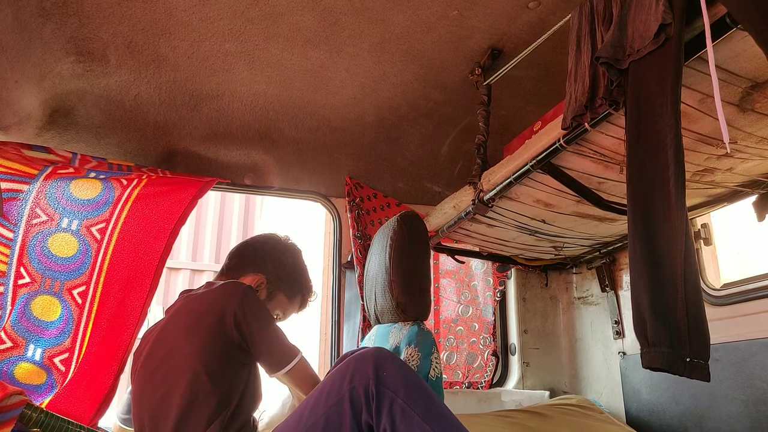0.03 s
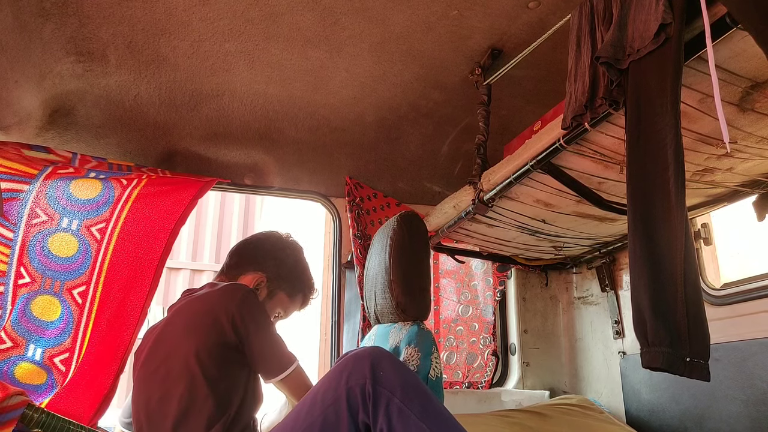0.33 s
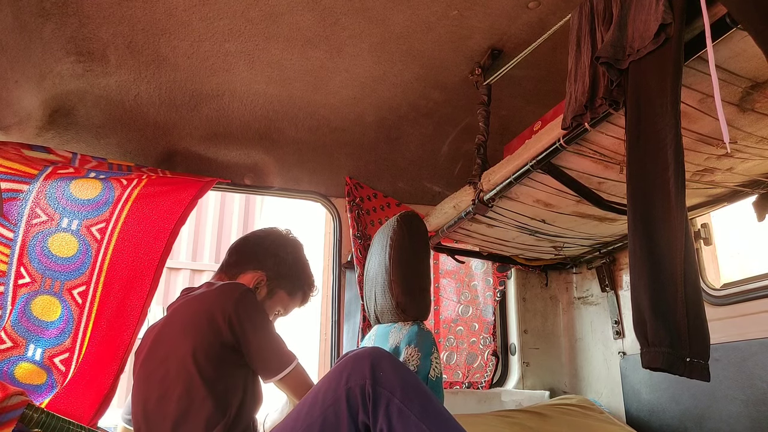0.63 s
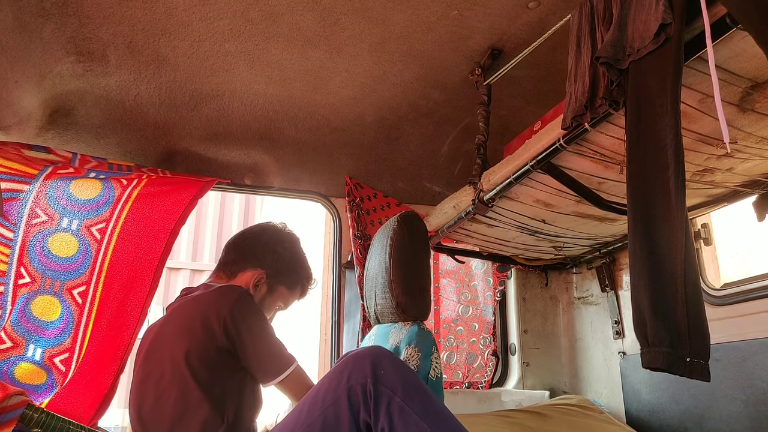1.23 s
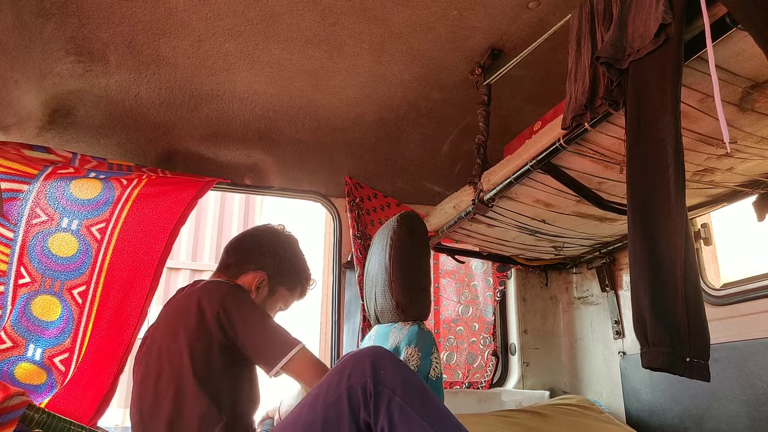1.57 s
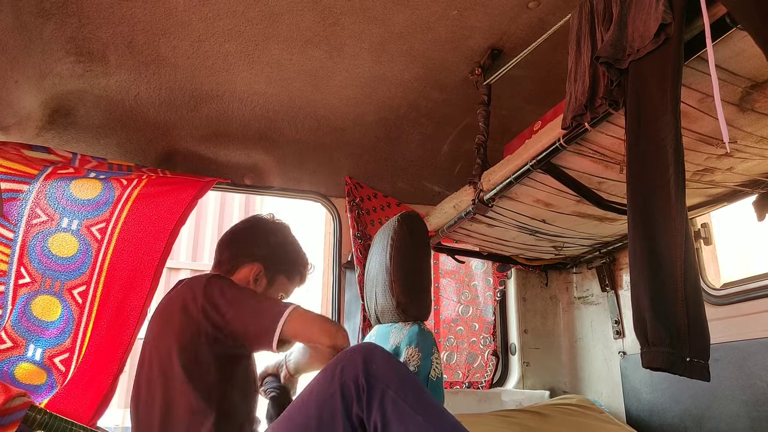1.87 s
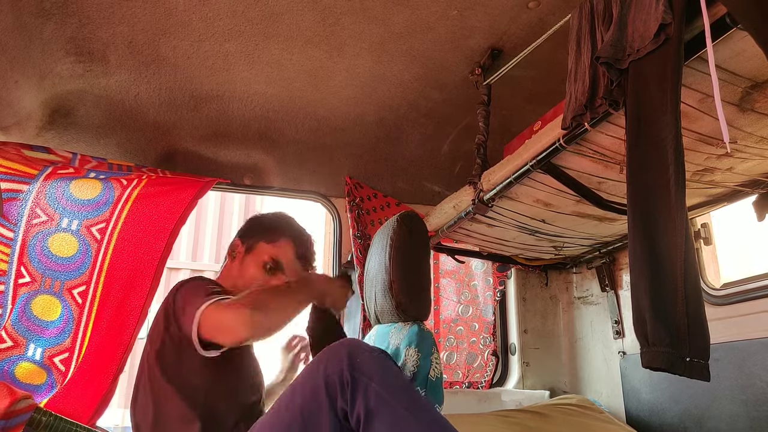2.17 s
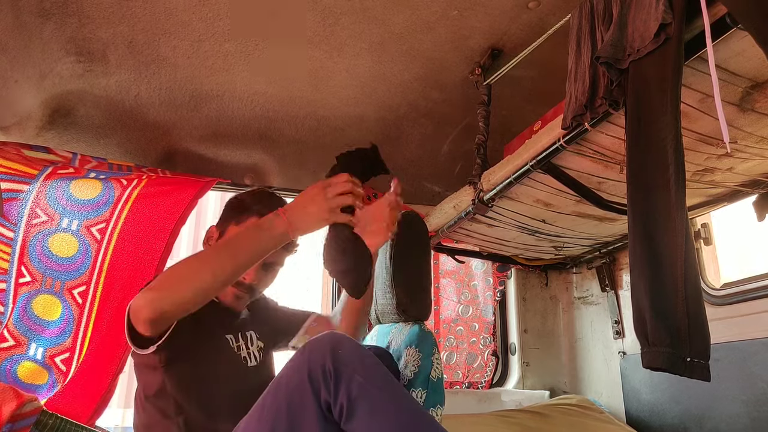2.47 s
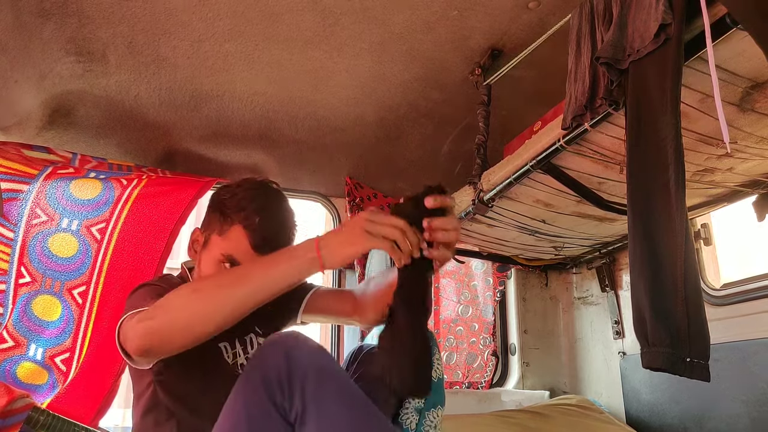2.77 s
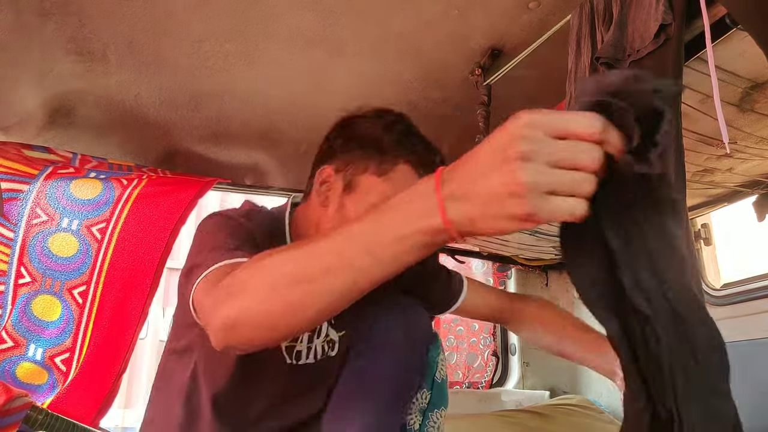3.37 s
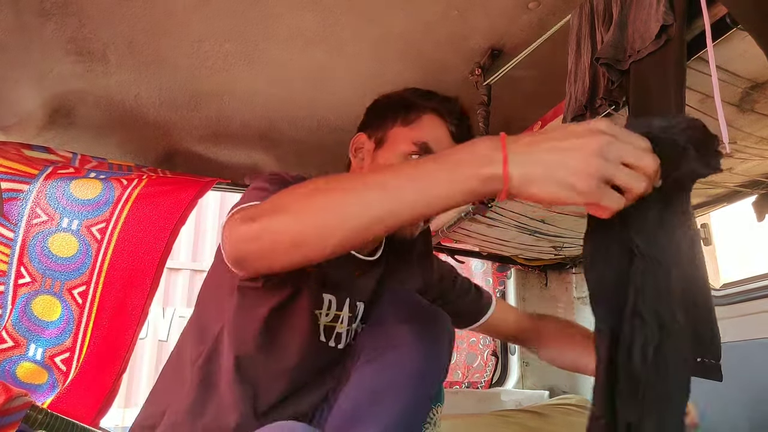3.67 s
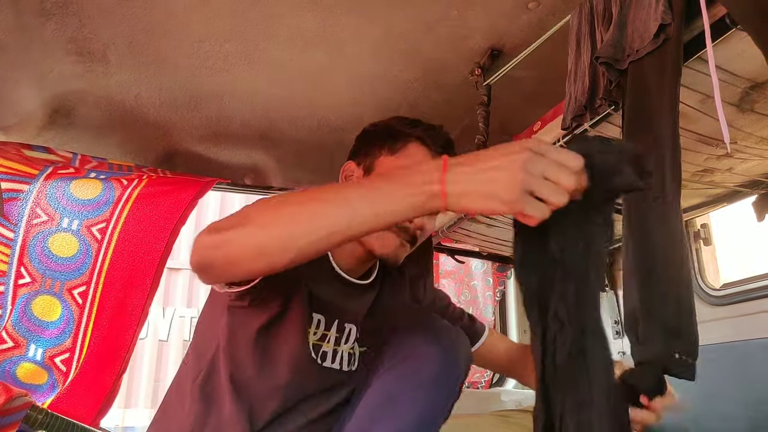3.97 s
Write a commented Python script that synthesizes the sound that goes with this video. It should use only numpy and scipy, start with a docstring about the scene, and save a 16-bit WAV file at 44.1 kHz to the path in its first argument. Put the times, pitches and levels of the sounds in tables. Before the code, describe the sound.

A garment rubs softly and flaps open close by inside a rumbling truck cabin.

```python
"""A truck cabin rumbles low throughout while a garment is handled close to a phone.
First the cloth is picked up: its fibres rub and its creases snap. From about 1.6 s it is drawn out, and
folds begin to flap. From 2.7 s it is shaken open: it billows, the tight weave zips, and at 3.2 s the
swing pushes air at the microphone. A last soft rub fades away. The left microphone opening faces the
cloth and rings near 6 kHz; the right one is shaded from it, so it is quieter and hisses."""
import sys
import numpy as np
from scipy import signal
from scipy.fft import rfft, irfft
from scipy.io import wavfile
from scipy.ndimage import uniform_filter1d

SR = 44100
rng = np.random.default_rng(int(sys.argv[2]) if len(sys.argv) > 2 else 0)


def to_wav(s):
    """Save 16-bit WAV."""
    ch = np.atleast_2d(s).T  # columns
    pcm = np.round(np.clip(ch, -1, 1) * 32767)  # PCM
    wavfile.write(sys.argv[1], SR, pcm.astype(np.int16))


N = 176400  # 4 seconds

# level at the shaded right opening compared with the left
SHADE_BASS_DB, SHADE_FLAP_DB, SHADE_WEAVE_DB, SHADE_HISS_DB, SHADE_ZIP_DB = -10.3, -13, -12.5, -21, -11


def undb(db):
    """Turn decibels into a number to multiply by."""
    return 10 ** (np.asarray(db) / 20)


def unit(x):
    """Scale a signal to a typical size (rms) of 1."""
    return x / np.std(x)


def noise():
    """White noise: all pitches equally strong."""
    return rng.standard_normal(N)


def colour(x, points):
    """Shape the tone by (pitch_hz, level_db) points; the result has size 1."""
    hz, db = np.array(points, float).T
    freqs = np.maximum(np.fft.rfftfreq(N, 1 / SR), 1)
    gain = undb(np.interp(np.log(freqs), np.log(hz), db))
    return unit(irfft(rfft(x) * gain, N))


def drift(rate_hz):
    """A smooth random wander of size 1."""
    width = max(int(SR / rate_hz), 1)
    return unit(uniform_filter1d(uniform_filter1d(noise(), width), width))


def swell(t, start, rise, hold, release):
    """Loudness that rises gently, holds and falls."""
    ramp = np.clip(np.minimum((t - start) / rise, 1 - (t - start - rise - hold) / release), 0, 1)
    return np.sin(np.pi / 2 * ramp)


def burst(t, start, rise, decay):
    """Loudness that jumps up and dies away."""
    return np.clip((t - start) / rise, 0, 1) * np.exp(-np.maximum(t - start - rise, 0) / decay)


def cabin_rumble(t):
    """A low, unevenly throbbing rumble reaches both openings in step."""
    # tone of the rumble: pitch_hz, level_db
    tone = [(12, -12), (25, -1), (37, 2), (49, -12), (68, -7), (82, -11), (104, -26), (160, -28),
            (300, -44), (800, -64), (4000, -100)]
    # its loudness over time: time_s, level_db
    loudness = [(0, -35.5), (1.3, -34.5), (1.9, -31.7), (2.7, -32.3), (3.1, -31), (4.0, -30.5)]
    throb_hz, throb_db = 9, 1.0
    level_db = np.interp(t, *np.array(loudness).T) + throb_db * drift(throb_hz)
    rumble = undb(level_db) * colour(noise(), tone)
    return np.array([rumble, undb(SHADE_BASS_DB) * rumble])


def cabin_hiss(t):
    """A faint wash of cabin noise and microphone hiss, different at each opening."""
    # tone on the left: pitch_hz, level_db
    left_tone = [(60, 1), (160, 1), (220, -2.5), (390, -2.5), (510, -5.5), (575, -1.5), (660, -11),
                 (1000, -15), (1450, -20), (1700, -18), (2800, -26), (4200, -26), (5900, -20), (7500, -31),
                 (10000, -35), (15500, -34)]
    # loudness on the left: time_s, level_db
    left_loudness = [(0, -52), (.4, -50.5), (1.0, -49.3), (1.9, -49), (2.6, -50.5), (4.0, -52)]
    # tone on the right: pitch_hz, level_db
    right_tone = [(60, 2), (160, 2), (300, -2), (600, -6), (1200, -10), (2500, -16.5), (5000, -18),
                  (7500, -25), (10000, -31), (15500, -30)]
    left = undb(np.interp(t, *np.array(left_loudness).T)) * colour(noise(), left_tone)
    right = undb(-53) * colour(noise(), right_tone)
    return np.array([left, right])


def fibre_slips(per_second=8000, spread_db=2.5):
    """Fibres slip in a dense stream of tiny clicks of uneven size."""
    slips = rng.random(N) < per_second / SR
    return slips * noise() * undb(spread_db * rng.exponential(size=N) / 2)


def rubbing(t):
    """Strokes and snapping creases make fibres slip: a bright hiss over the duller sound of the weave."""
    # cloth sliding on cloth: start_s, rise_s, hold_s, release_s, hiss_db, weave_db
    strokes = [(.185, .015, .03, .07, -54.5, -62), (.455, .018, .01, .04, -57, -63),
               (.57, .03, .03, .04, -61, -72), (.675, .015, .005, .04, -60.5, -58),
               (1.56, .09, .02, .05, -60.5, -61), (1.74, .02, .03, .03, -60, -70),
               (1.83, .015, .07, .07, -54.5, -59), (2.02, .04, .1, .06, -57, -64),
               (2.16, .12, .08, .12, -50.5, -56), (2.42, .05, .02, .04, -53, -58),
               (2.5, .03, .02, .26, -57, -62), (2.735, .08, .08, .12, -50.5, -51),
               (2.945, .05, .01, .09, -41.5, -49.5), (3.02, .05, .01, .11, -44.5, -52),
               (3.11, .04, .04, .06, -51.5, -54), (3.188, .018, .005, .035, -45, -47),
               (3.215, .09, .02, .07, -45, -48), (3.33, .05, .04, .12, -48.5, -55),
               (3.47, .1, .03, .18, -45.8, -49), (3.77, .05, .15, .2, -58.5, -64)]
    # creases snapping over: start_s, hiss_db, weave_db, decay_s
    snaps = [(.248, -50, -66, .004), (.349, -44.5, -64, .005), (.356, -46, -68, .009),
             (.986, -50, -69, .009), (1.231, -49.5, -68, .007), (1.266, -52.5, -68, .006),
             (1.283, -52, -68, .007), (1.44, -57, -70, .006), (1.7095, -42, -48.5, .005),
             (1.816, -46, -47, .005), (1.822, -40.7, -43.5, .006), (1.9, -50, -58, .01),
             (2.487, -46.5, -58, .006), (3.33, -40, -45, .012)]
    # hiss at the ringing left opening: pitch_hz, level_db
    ringing_tone = [(1500, -32), (3000, -16), (4200, -10), (5200, -4), (5900, 0), (6400, -2), (7200, -13),
                    (8600, -22), (10500, -42), (15000, -60)]
    # hiss at the shaded right opening: pitch_hz, level_db
    shaded_tone = [(1000, 0), (4000, 0), (7000, -1), (8800, 0), (10500, -16), (15000, -30)]
    # tone of the weave: pitch_hz, level_db
    weave_tone = [(120, -10), (300, 1), (700, -1), (1200, -1), (1900, -2), (3000, -3.5), (4500, -8),
                  (8000, -30), (12000, -55)]
    grip_hz, grip_db, snap_rise_s = 45, .85, .0015
    grip = undb(grip_db * drift(grip_hz))  # uneven friction
    moves = [(grip * swell(t, *timing), hiss_db, weave_db) for *timing, hiss_db, weave_db in strokes]
    for start, hiss_db, weave_db, decay in snaps:
        moves.append((burst(t, start, snap_rise_s, decay), hiss_db, weave_db))
    # overlapping moves add in power
    hiss = np.sqrt(sum((shape * undb(db)) ** 2 for shape, db, _ in moves))
    weave = np.sqrt(sum((shape * undb(db)) ** 2 for shape, _, db in moves))
    left = hiss * colour(fibre_slips(), ringing_tone) + weave * colour(fibre_slips(), weave_tone)
    right = undb(SHADE_HISS_DB) * hiss * colour(fibre_slips(), shaded_tone)
    right += undb(SHADE_WEAVE_DB) * weave * colour(noise(), weave_tone)
    return np.array([left, right])


def puff(low_hz, high_hz):
    """Swirling air: noise that lies mostly between two pitches."""
    # hollow tone that all flaps share: pitch_hz, level_db
    tone = [(100, -1), (160, 3), (240, 3.5), (300, -3.5), (360, 1.5), (500, -2), (600, -7), (700, 1),
            (1400, -1), (3000, -3)]
    freqs = np.maximum(np.fft.rfftfreq(N, 1 / SR), 1)
    band = 1 / np.sqrt((1 + (low_hz / freqs) ** 6) * (1 + (freqs / high_hz) ** 10))
    return colour(irfft(rfft(noise()) * band, N), tone)


def flaps(t):
    """Each flapping fold gives a short, soft, hollow puff of air."""
    # flapping folds: start_s, level_db, low_hz, high_hz, decay_s
    folds = [(1.815, -44.5, 250, 750, .009), (2.702, -44, 220, 680, .022), (2.733, -38.8, 120, 360, .045),
             (2.82, -47, 130, 750, .1), (2.938, -38, 100, 420, .04), (2.955, -33.4, 350, 1380, .012),
             (3.201, -33, 190, 500, .035), (3.205, -40, 600, 1200, .04), (3.22, -28.5, 170, 280, .034),
             (3.24, -38, 380, 560, .04), (3.28, -34.5, 170, 540, .04), (3.288, -43.5, 560, 1150, .05),
             (3.36, -36, 170, 330, .03), (3.435, -43.5, 200, 480, .03), (3.49, -41, 180, 500, .04),
             (3.548, -38.5, 150, 650, .032), (3.645, -46, 120, 400, .04)]
    rise_s, likeness = .006, .6  # a likeness of 1 gives both sides the same puff
    out = np.zeros((2, N))
    for start, db, low_hz, high_hz, decay in folds:
        left = puff(low_hz, high_hz)
        right = likeness * left + np.sqrt(1 - likeness ** 2) * puff(low_hz, high_hz)
        out += undb(db) * burst(t, start, rise_s, decay) * np.array([left, undb(SHADE_FLAP_DB) * right])
    return out


def billows(t):
    """Cloth fills with air and flutters: a hollow note that drops as the cloth goes slack."""
    # panels of cloth pulled tight by air: start_s, rise_s, decay_s, first_hz, last_hz, level_db
    panels = [(2.701, .006, .014, 430, 330, -42), (2.71, .015, .04, 180, 150, -41),
              (3.197, .026, .018, 450, 300, -34), (3.198, .032, .026, 200, 145, -28),
              (3.28, .018, .028, 420, 345, -40), (3.295, .016, .022, 165, 140, -31),
              (3.495, .04, .04, 200, 150, -34)]
    sag_s, flutter_rate_hz, wobble_hz, wobble_db = .025, 90, 22, 2
    out = np.zeros(N)
    for start, rise, decay, first_hz, last_hz, db in panels:
        pitch_hz = last_hz + (first_hz - last_hz) * np.exp(-np.maximum(t - start, 0) / sag_s)
        pitch_hz += wobble_hz * drift(flutter_rate_hz)
        flutter = undb(wobble_db * drift(flutter_rate_hz))
        note = unit(flutter * np.sin(2 * np.pi * np.cumsum(pitch_hz) / SR))
        out += undb(db) * burst(t, start, rise, decay) * note
    return np.array([out, undb(SHADE_FLAP_DB) * out])


def zips(t):
    """Ribs of the tight weave skip past each other unevenly: a rasp whose pitch follows the pull."""
    # pulls on the weave: start_s, rise_s, hold_s, release_s, first_hz, last_hz, level_db
    pulls = [(2.757, .015, .01, .018, 950, 1100, -46), (2.805, .025, .04, .06, 1090, 1120, -51.5),
             (2.825, .02, .02, .075, 860, 900, -49.5), (3.178, .018, .018, .022, 1780, 1860, -50.5),
             (3.228, .025, .018, .02, 1310, 1440, -49), (3.325, .015, .008, .015, 2180, 2380, -52)]
    blur_hz = 240  # smears the pitch into a rasp
    out = np.zeros((2, N))
    for start, rise, hold, release, first_hz, last_hz, db in pulls:
        pitch_hz = np.interp(t, [start, start + rise + hold + release], [first_hz, last_hz])
        phase = 2 * np.pi * np.cumsum(pitch_hz) / SR
        loudness = undb(db) * swell(t, start, rise, hold, release)
        for side, side_db in enumerate([0, SHADE_ZIP_DB]):
            rasp = unit(drift(blur_hz) * np.cos(phase) + drift(blur_hz) * np.sin(phase))
            out[side] += undb(side_db) * loudness * rasp
    return out


def gust(t):
    """The swinging cloth pushes one deep gust of air at both openings."""
    # the push of air: start_s, rise_s, hold_s, release_s, level_db
    push = (3.185, .03, .23, .25, -22)
    # its tone: pitch_hz, level_db
    tone = [(15, -5), (30, 2), (48, -6), (78, -2), (105, -18), (150, -16), (220, -28), (400, -44),
            (1000, -66), (4000, -105)]
    *timing, db = push
    air = undb(db) * swell(t, *timing) * colour(noise(), tone)
    return np.array([air, undb(SHADE_BASS_DB) * air])


def scene():
    """The cloth over the cabin's background, as left and right channels."""
    t = np.arange(N) / SR
    return cabin_rumble(t) + cabin_hiss(t) + rubbing(t) + flaps(t) + billows(t) + zips(t) + gust(t)


def record(dry):
    """The phone cuts off the highest treble."""
    top_hz = 15750
    return signal.sosfilt(signal.ellip(10, .2, 80, top_hz, fs=SR, output="sos"), dry)


dry = scene()
out = record(dry)
to_wav(out)
```